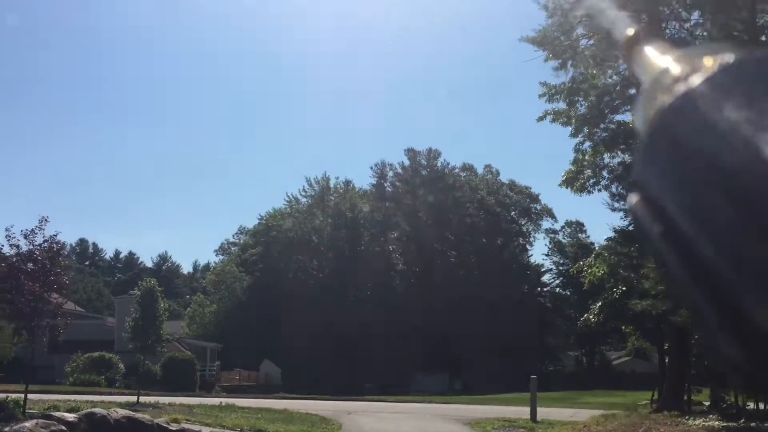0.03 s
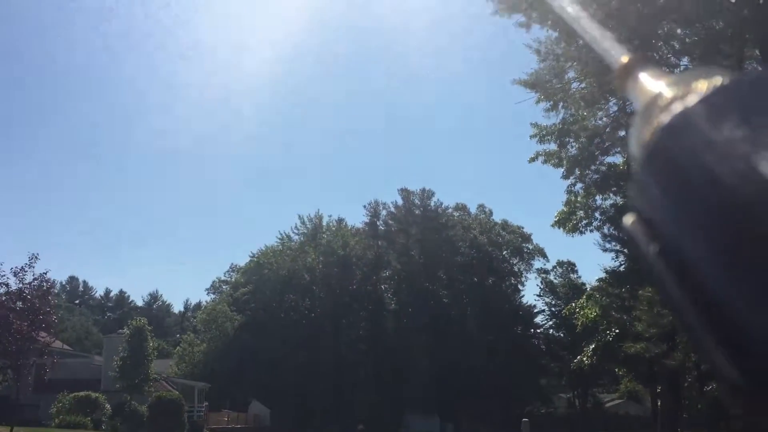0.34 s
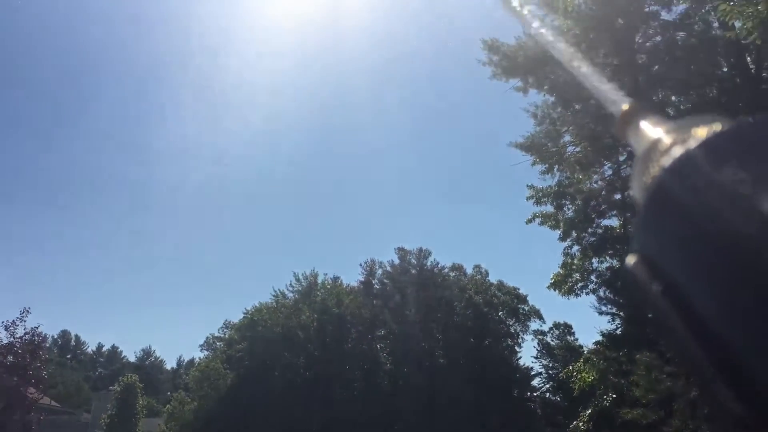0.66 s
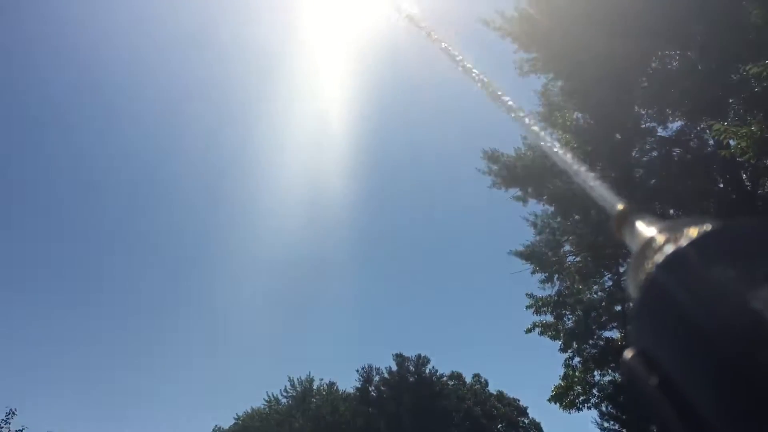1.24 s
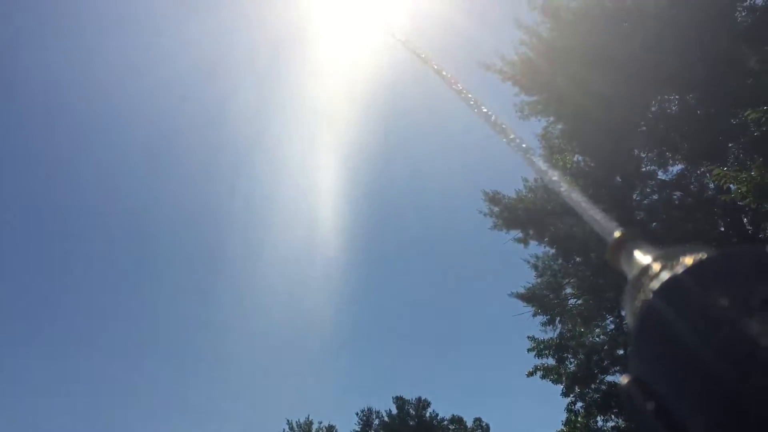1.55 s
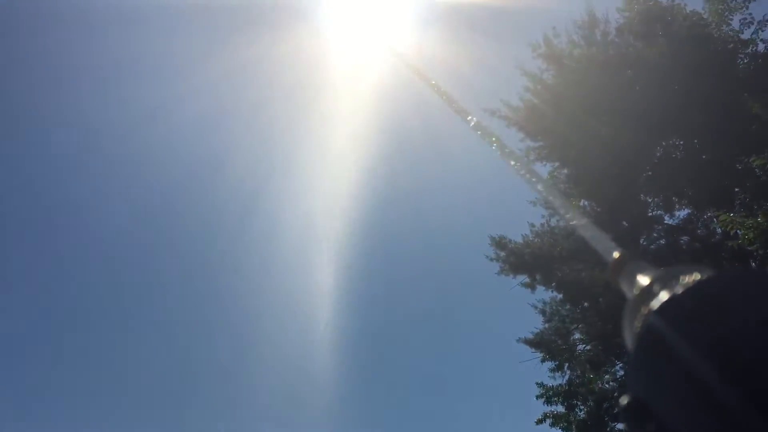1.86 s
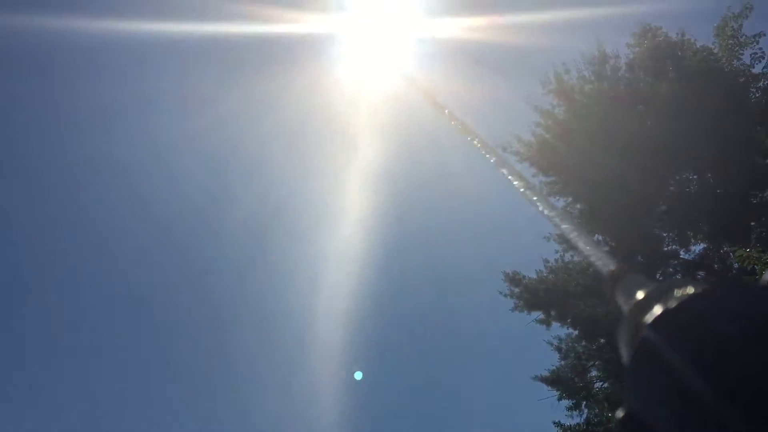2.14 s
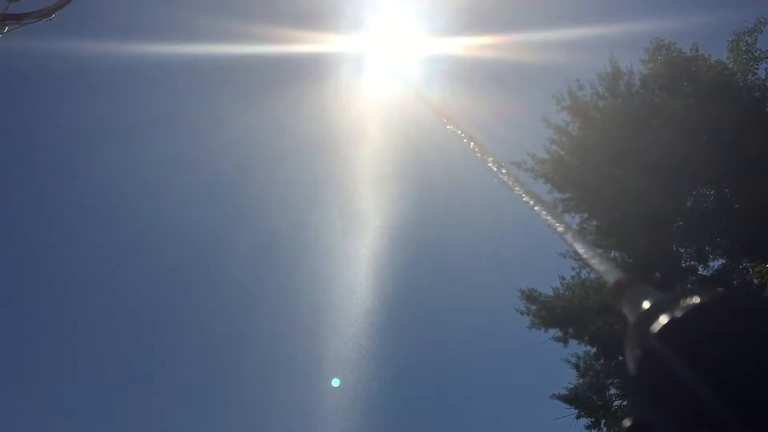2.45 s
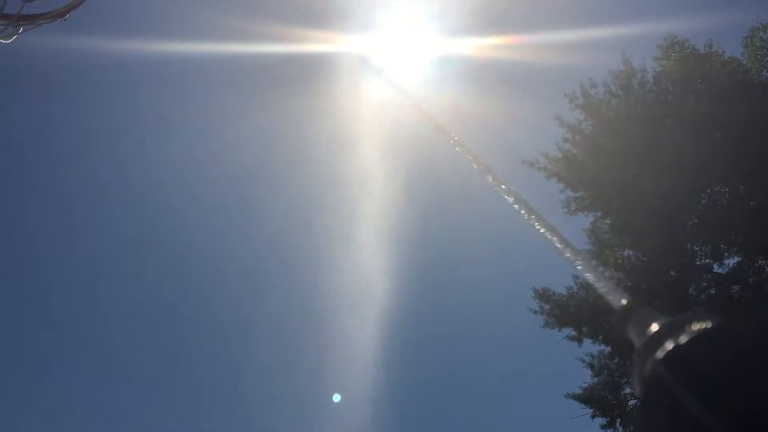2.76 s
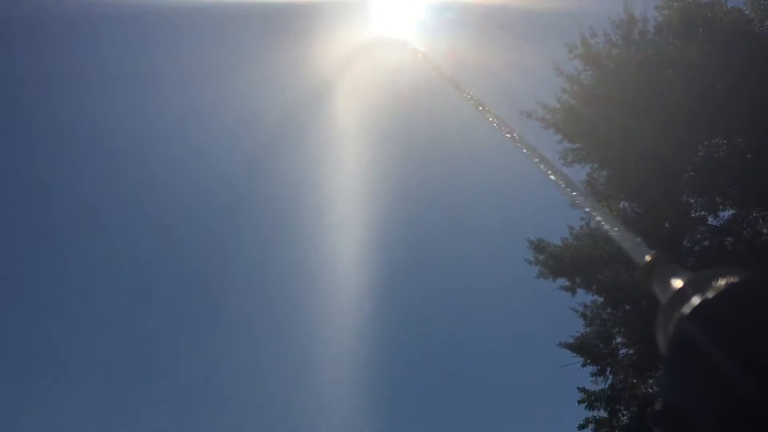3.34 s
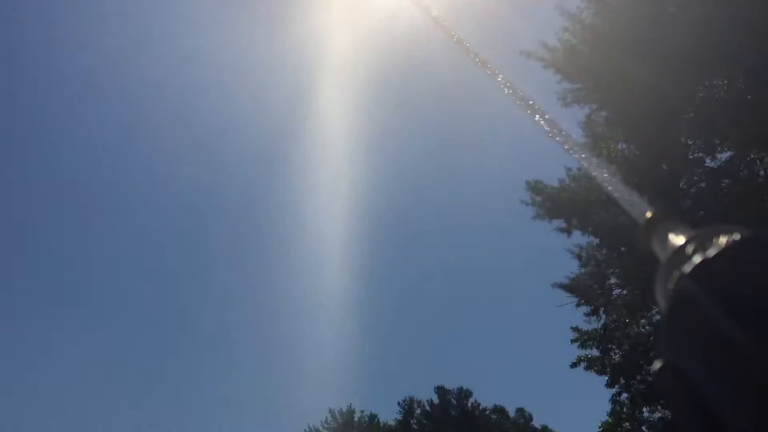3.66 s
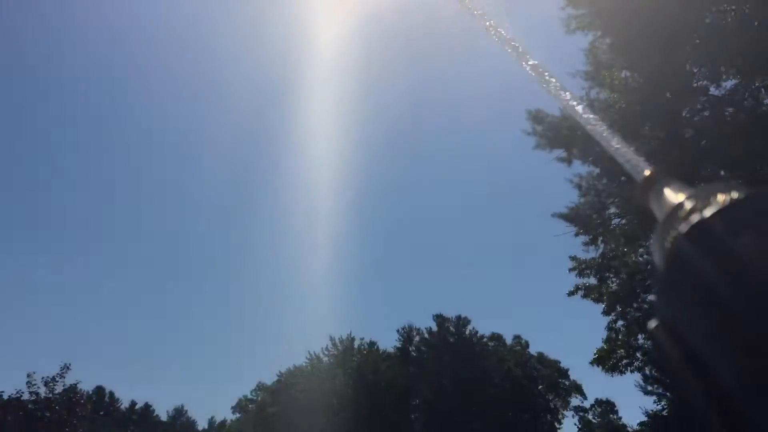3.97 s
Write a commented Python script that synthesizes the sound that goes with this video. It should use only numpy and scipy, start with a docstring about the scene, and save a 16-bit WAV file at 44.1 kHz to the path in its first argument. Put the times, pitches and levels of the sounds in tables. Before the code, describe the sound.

Water gun spray starts with a sharp splat, then hisses steadily as drops tick down.

```python
"""Outdoors, beside a water gun aimed at the sky. Air and water spit from the nozzle in a burst,
and slugs of water slap loudly on the microphone. The jet sputters, then hisses steadily as the
pressure recovers. Stray drops tick on the microphone housing and thin out; two soft handle knocks
and two faint drips follow. Underneath are a low rumble and the hum of the pump motor."""
import sys
import numpy as np
from scipy import signal
from scipy.io import wavfile
from scipy.ndimage import uniform_filter1d

SR = 44100
rng = np.random.default_rng(int(sys.argv[2]) if len(sys.argv) > 2 else 0)


def log_audio(samples):
    """Write samples as a 16-bit WAV file to the path given in sys.argv[1]."""
    # one column per channel
    frames = np.atleast_2d(samples).T
    # limit to full scale, then quantise
    limited = np.clip(frames, -1, 1)
    pcm = np.round(limited * 32767).astype(np.int16)
    wavfile.write(sys.argv[1], SR, pcm)


N = 176400
T = np.arange(N) / SR

# water pressure behind the jet (time [s], level [dB])
PRESSURE_DB = [(0, -2.5), (.15, -10), (.25, -10.5), (.4, -7.5), (.55, -4), (.635, -4), (.675, 0), (1.64, 0),
               (2.6, 0), (4, -.5)]
# jet hiss (frequency [Hz], relative density [dB])
JET_SPECTRUM = [(20, -40), (250, -20), (480, -8.5), (640, -0.5), (790, -7), (1000, -0.5), (1250, -0.5),
                (2020, -1), (2330, -7.5), (2750, -14.5), (3200, -2.5), (4200, -3.5), (4900, -6.5),
                (5700, -6.5), (6450, -3), (9250, -3.5), (10300, -11), (11100, -7.5), (13000, -12.5),
                (15800, -14)]
# air in the nozzle (frequency [Hz], relative density [dB])
FIZZ_SPECTRUM = [(1000, -17.5), (5000, -16), (6000, 2), (7200, -4), (9500, -5), (15000, -15)]
# nozzle whistle (time [s], level [dB])
WHISTLE_DB = [(.6, -71), (1.1, -52), (1.3, -58), (2.6, -64), (4, -64)]
# opening crackle (time [s], level [dB])
BURST_DB = [(0, -6), (.005, -9.5), (.015, -16), (.03, -18.5), (.04, -20), (.055, -21), (.068, -25),
            (.078, -47), (.12, -66)]
# opening crackle (frequency [Hz], relative gain [dB])
BURST_SPECTRUM = [(100, 11.5), (350, -3.5), (650, -3), (900, -4), (1800, -2), (2600, -8), (3800, 3.5),
                  (5200, 0), (9000, 3.5), (15500, -1), (17000, -30)]
# water slugs on the microphone (time [s], thump level [dB], slap peak [dB])
SLUG_HITS = [(.003, -16, 0), (.0085, -8, -10.5), (.0386, -20.5, 5.5), (0.0403, -1.5, 4.5),
             (.0905, -40, -31), (.1008, -33.5, -29), (.133, -52, -41)]
# slap of a slug (frequency [Hz], relative gain [dB])
SLAP_SPECTRUM = [(60, 2.5), (300, -13), (650, 6.5), (950, -0.5), (2400, -1), (4200, -0.5), (5200, -15.5),
                 (16000, -19)]
# large drops (time [s], relative level [dB])
DROP_HITS = [(.0348, 8), (.0451, 0), (.0522, 3), (.0603, 0), (.0624, -2), (.069, -4), (.0724, -8),
             (.0904, -7), (.1007, -3.5), (.1052, -8.5), (.1329, -11), (.1823, -11.5), (.3023, -11),
             (.3091, -11), (.3238, -7), (.3283, -11), (.3378, -7.5), (.353, -18), (.426, -16.5),
             (.4828, -12.5), (.5091, -13), (.5492, -12), (.6594, -6), (.6772, -20), (.6834, -8),
             (.6852, -10), (.6973, -10), (.6996, -8), (.7057, -14), (.7099, -20), (.717, -1.5), (.7205, -6),
             (.7253, -6.5), (.761, -9), (.7885, -9), (.8202, -13.5), (.8499, -9), (.8522, -15), (.856, -8),
             (.919, -17), (.957, -12.5), (1.039, -2.5), (1.041, -6), (1.0648, -15), (1.0783, -2.5),
             (1.0887, -3), (1.0976, -10), (1.1037, -8.5), (1.1178, -7), (1.2702, -11), (1.3158, -11),
             (1.3682, -12), (1.3973, -12), (1.4048, -10), (1.4355, -2), (1.4389, -11.5), (1.446, -17),
             (1.5454, -15.5), (1.5727, -17), (1.7098, -2), (1.7122, -5), (1.7145, -6), (1.7164, -5),
             (1.7221, -7.5), (1.872, -22), (1.896, -19), (1.972, -17), (2.1206, -12.5), (2.157, -19),
             (2.226, -18), (2.576, -20), (2.6072, -15.5)]
# drop on the housing (frequency [Hz], relative gain [dB])
TICK_SPECTRUM = [(100, -27), (500, -21), (1800, -22.5), (2600, -20), (3300, -12.5), (4300, -10),
                 (5000, -12.5), (6800, -6.5), (8700, -6), (10300, -5.5), (11500, -3), (13500, 0),
                 (15500, -3.5), (17000, -7)]
# stray spray on the housing (time [s], level [dB])
SPRAY_DB = [(.075, -31), (.11, -38.5), (.2, -39), (.275, -40.5), (.32, -40), (.345, -36.5), (.37, -45.5),
            (.44, -47.5), (.54, -40), (.61, -43.5), (.665, -40), (.715, -28), (.78, -37.5), (.88, -42.5),
            (.93, -39), (1, -40.5), (1.09, -35.5), (1.18, -41), (1.39, -47), (1.47, -52), (1.8, -50.5),
            (1.96, -45), (2.3, -58), (2.65, -50.5), (4, -58)]
# nearby drips (time [s], splat frequency [Hz], level [dB])
DRIP_HITS = [(3.255, 2260, -36.5), (3.482, 2113, -32)]
# knocks on the handle (time [s], level [dB])
KNOCK_HITS = [(2.503, -37.5), (2.518, -39.5)]
# handle modes (frequency [Hz], relative level [dB], T60 [s])
HANDLE_MODES = [(124, -3, 0.21), (244, -3, 0.2)]
# pump load (time [s], level [dB])
LOAD_DB = [(0, -3), (.2, -25.5), (.44, -17.5), (.54, -11), (.635, -5.5), (.68, 0.5), (2, 0.5), (2.7, 0.5),
           (4, -0.5)]
# motor hum (shaft order [1], relative level [dB])
HUM_ORDERS = [(2, -10), (4, -5.5), (5, -2.5), (6, 2.5), (7, -11), (8, -9), (9, -8.5), (10, -14), (13, -9)]
# outdoor rumble (frequency [Hz], relative density [dB])
RUMBLE_SPECTRUM = [(20, -37), (38, -16), (62, 2), (100, 0), (160, -0.5), (230, -5.5), (330, -4.5),
                   (450, -11.5), (800, -36.5)]


def amp(db):
    """Decibels to gain."""
    return 10 ** (np.asarray(db) / 20)


def unit(x):
    """Scale to rms 1."""
    return x / np.sqrt(np.mean(x ** 2) + 1e-20)


def envelope(points):
    """Gain per sample from (time [s], level [dB])."""
    return amp(np.interp(T, *np.transpose(points)))


def spectrum_db(spectrum, hz):
    """Interpolate on a log-frequency axis."""
    points_hz, points_db = np.transpose(spectrum)
    return np.interp(np.log(hz + 1), np.log(points_hz + 1), points_db)


def add(mix, start_s, sound):
    """Mix in place at start_s."""
    part = mix[max(round(start_s * SR), 0):][:len(sound)]
    part += sound[:len(part)]


def click(spectrum, size=2048):
    """Minimum-phase click, peak 1."""
    hz = abs(np.fft.fftfreq(size, 1 / SR))
    log_gain = np.log(amp(spectrum_db(spectrum, hz)))
    response = np.exp(np.conj(signal.hilbert(log_gain)))
    pulse = np.fft.ifft(response).real[:size // 2]
    return pulse / abs(pulse).max()


def ticks(hits, spectrum):
    """One coloured click per impact."""
    return signal.oaconvolve(hits, click(spectrum))[:N]


def patter(rate_per_s, spread_db, cap):
    """Random impacts, mostly small; sizes span cap * spread_db."""
    sizes = amp(spread_db * np.minimum(rng.exponential(1, N), cap))
    return sizes * rng.choice([-1, 1], N) * (rng.random(N) < rate_per_s / SR)


def coloured_noise(spectrum, patch_db, flicker_db, size=512):
    """Noise with drifting spectral patches and all-band flicker, rms 1."""
    hz, hop = np.fft.rfftfreq(size, 1 / SR), size // 4
    real, imag, patches = rng.standard_normal((3, N // hop + 5, len(hz)))
    patches = uniform_filter1d(patches, size=14, axis=0)
    patches = unit(uniform_filter1d(patches, size=8, axis=1))
    flicker = unit(uniform_filter1d(rng.standard_normal(len(real)), size=5))[:, None]
    gain = amp(spectrum_db(spectrum, hz) + patch_db * patches + flicker_db * flicker)
    frames = (real + 1j * imag) * gain
    return unit(signal.istft(frames.T, nperseg=size, noverlap=size - hop)[1][:N])


def narrow_noise(hz, width_hz):
    """Noise band around a steady or moving centre, rms 1."""
    pole = np.exp(-np.pi * width_hz / SR)
    real, imag = rng.standard_normal((2, N))
    baseband = signal.lfilter([1], [1, -2 * pole, pole * pole], real + 1j * imag)
    carrier = np.exp(2j * np.pi * np.cumsum(hz * np.ones(N)) / SR)
    return unit((baseband * carrier).real)


def jet(hiss_db=-41, body_hz=900, fizz_db=-42, fizz_at_s=0.31, fizz_width_s=0.033):
    """The nozzle hisses with the pressure, fizzes once as it fills and whistles faintly."""
    fizz = amp(fizz_db) * coloured_noise(FIZZ_SPECTRUM, patch_db=2, flicker_db=2)
    fizz *= np.exp(-((T - fizz_at_s) / fizz_width_s) ** 2)
    whistle = envelope(WHISTLE_DB) * narrow_noise(hz=1665, width_hz=68)
    pressure = envelope(PRESSURE_DB)
    hiss = coloured_noise(JET_SPECTRUM, patch_db=1.37, flicker_db=0.38)
    body = signal.sosfiltfilt(signal.butter(2, body_hz, fs=SR, output="sos"), hiss)
    hiss = hiss - body + body * pressure ** 0.34  # lows fade faster as pressure falls
    return amp(hiss_db) * pressure * hiss + fizz + whistle


def burst(top_hz=365, end_hz=55, sag_s=0.0034, thump_decay_s=0.0102, crack_db=-6, crack_decay_s=0.0008):
    """Air and water crackle out; each slug hits with a slap, a crack and a falling thump."""
    hits = unit(patter(rate_per_s=1800, spread_db=4.2, cap=2.6))
    rush = amp(-3.5) * rng.standard_normal(N)
    out = envelope(BURST_DB) * unit(ticks(hits + rush, BURST_SPECTRUM))
    t = T[:SR // 5]
    thump_hz = end_hz + (top_hz - end_hz) * np.exp(-t / sag_s)
    thump = -np.sin(2 * np.pi * np.cumsum(thump_hz) / SR) * np.exp(-t / thump_decay_s)
    for start_s, thump_db, slap_db in SLUG_HITS:
        crack = rng.standard_normal(len(t)) * np.exp(-t / crack_decay_s)
        add(out, start_s, amp(thump_db) * thump)
        add(out, start_s, amp(slap_db) * click(SLAP_SPECTRUM))
        add(out, start_s, amp(slap_db + crack_db) * crack)
    return out


def drops(gain_db=0.5, splash_db=-9, splash_decay_s=0.0011):
    """Large drops hit the housing: one sharp tick and a tiny splash each."""
    hits, t = np.zeros(N), T[:512]
    for start_s, db in DROP_HITS:
        splash = rng.standard_normal(len(t)) * np.exp(-t / splash_decay_s)
        hit = amp(splash_db) * splash / np.linalg.norm(splash)
        hit[0] = 1  # the tick
        add(hits, start_s, amp(db + gain_db) * hit)
    return ticks(hits, TICK_SPECTRUM)


def spray(mist_db=-10.5, clump_db=8):
    """Droplets and clumps of fine mist land on the housing."""
    clumps = amp(clump_db * unit(uniform_filter1d(rng.standard_normal(N), size=200)))
    droplets = unit(patter(rate_per_s=1800, spread_db=5, cap=3.6))
    mist = amp(mist_db) * unit(clumps * rng.standard_normal(N))
    return envelope(SPRAY_DB) * unit(ticks(droplets + mist, TICK_SPECTRUM))


def drips(splat_decay_s=0.0029, ring_db=-12, ring_ratio=0.87, sag_hz_per_s=2800, ring_decay_s=0.043):
    """Each drip lands with a small splat and a short falling ring."""
    out = np.zeros(N)
    for start_s, hz, db in DRIP_HITS:
        splat = narrow_noise(hz, width_hz=800) * np.exp(-T / splat_decay_s)
        ring = narrow_noise(hz * ring_ratio - sag_hz_per_s * T, width_hz=47) * np.exp(-T / ring_decay_s)
        add(out, start_s, amp(db) * (splat + amp(ring_db) * ring))
    return out


def knocks():
    """Soft knocks ring two low, damped handle modes."""
    out, t = np.zeros(N), T[:SR // 2]
    ring = sum(amp(db - 60 * t / t60_s) * np.sin(2 * np.pi * hz * t) for hz, db, t60_s in HANDLE_MODES)
    for start_s, db in KNOCK_HITS:
        add(out, start_s, amp(db) * ring)
    return out


def pump(shaft_hz=30.08, speed_waver=0.003, hum_db=-56.5, rumble_db=-51.7):
    """Wavering shaft orders in a low rumble; both levels follow the load."""
    drift = unit(np.interp(T, np.linspace(0, T[-1], 24), rng.standard_normal(24)))
    turns = np.cumsum(shaft_hz * (1 + speed_waver * drift)) / SR
    hum = sum(amp(db) * np.sin(2 * np.pi * (order * turns + rng.random())) for order, db in HUM_ORDERS)
    rumble = coloured_noise(RUMBLE_SPECTRUM, patch_db=2, flicker_db=0, size=4096)
    return envelope(LOAD_DB) * (amp(hum_db) * np.sqrt(2) * hum + amp(rumble_db) * rumble)


def scene():
    """All sources at one microphone."""
    return (jet() + pump() + spray() + drops() + burst() + knocks() + drips())[None]


def record(dry):
    """Clip the burst's peaks at full scale, then a 16 kHz low-pass."""
    lowpass = signal.firwin(301, 16000, window=("kaiser", 8), fs=SR)
    return signal.oaconvolve(np.clip(dry, -1, 1), lowpass[None], "same")


dry = scene()
out = record(dry)
log_audio(out)
```